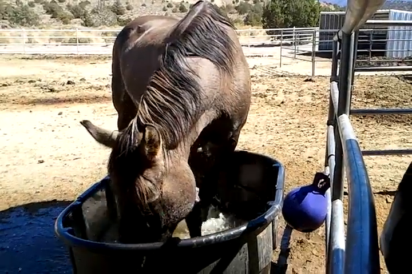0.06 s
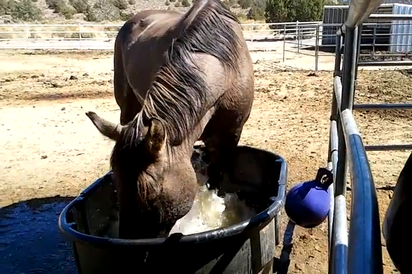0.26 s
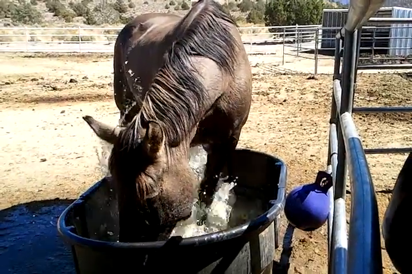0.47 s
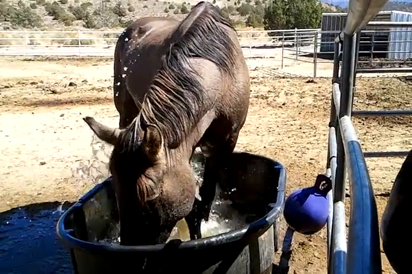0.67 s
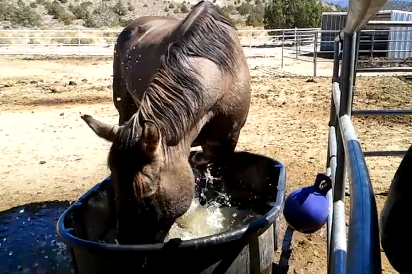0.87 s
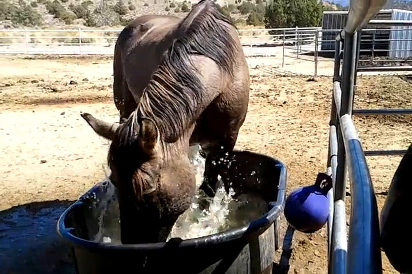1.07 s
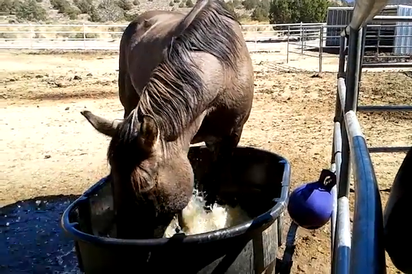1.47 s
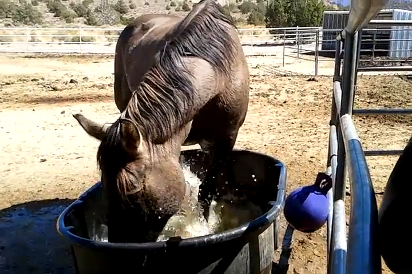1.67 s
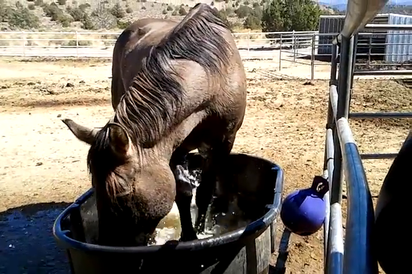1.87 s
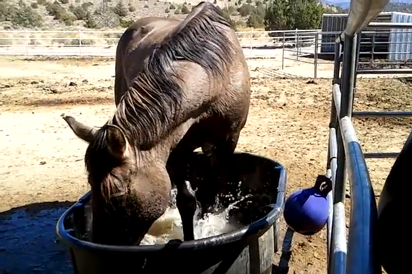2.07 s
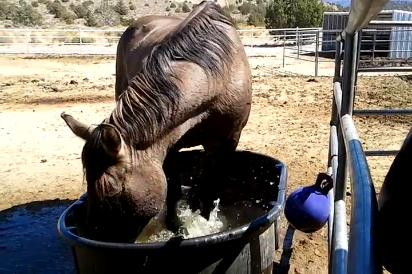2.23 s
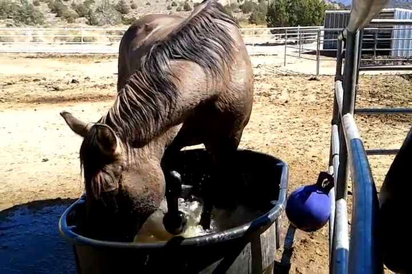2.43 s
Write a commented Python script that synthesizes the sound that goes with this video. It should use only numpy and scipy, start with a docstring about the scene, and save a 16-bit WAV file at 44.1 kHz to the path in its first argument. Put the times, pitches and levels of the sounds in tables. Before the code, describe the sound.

Splashing water and hollow hoof thumps from a horse pawing in a plastic tub.

```python
"""Booming knocks and splashing water: a horse paws in a big plastic trough in an open corral.
Its hoof hits the wall and floor, which boom briefly. Its leg throws up slaps, spray and bubbles
and drags gulps of air under, while the water heaves against the tub.
A faint breeze lies behind it all, and the two hardest knocks overload the microphone."""
import sys
import numpy as np
from scipy import signal
from scipy.fft import rfft, irfft, next_fast_len
from scipy.io import wavfile
from scipy.ndimage import map_coordinates

SR = 44100
rng = np.random.default_rng(int(sys.argv[2]) if len(sys.argv) > 2 else 0)


def dump(signal):
    """Clip the signal to [-1, 1] and save it as 16-bit WAV at the path in sys.argv[1]."""
    limited = np.clip(np.atleast_2d(signal).T, -1, 1)
    pcm = np.round(limited * 32767).astype(np.int16)
    wavfile.write(sys.argv[1], SR, pcm)


N = 110250  # 2.5 seconds

# Hoof blows (time [s], level [dB], brightness [dB per octave], rise time [s],
# crack level [dB], ring length [factor])
HOOF_BLOWS = [(.232, -21, 4.5, 0.0039, -42, 1.1), (0.26, -20, 2.5, 0.0015, -18, .6),
              (0.4373, -5, -1, 0.0015, -9, .9), (0.495, -17.5, -2.5, 0.0021, -55, 1.1),
              (0.566, -17.5, -5.5, 0.0034, -45, 0.22), (0.886, -25, 7.5, 0.0037, -26, 0.94),
              (0.902, -30.5, 5, 0.001, -28, 1.5), (1.0821, -5.5, 1, 0.0023, -13.5, 0.77),
              (1.16, -19.5, -4, 0.013, -39, 0.93), (1.754, -22.5, -2, 0.0027, -41, 0.94),
              (2.174, -18, -2, 0.0039, -22.5, 0.91)]
# The filled trough's own notes, varied by each blow (pitch [Hz], level [dB], base fade time [s])
TROUGH_NOTES = [(45.6, -12.5, 0.25), (89, -7, 0.15), (117.1, -0.5, 0.37), (135.9, -8, 0.24),
                (175.4, -4, 0.35), (198.3, -8, 0.41), (221.3, -9.5, 0.34), (270.5, -8.5, 0.48),
                (292.7, -3.5, 0.23), (336, -12.5, 0.3), (386.2, -14, 0.25), (439.6, -10.5, 0.17),
                (489, -10.5, 0.15), (737, -20.5, 0.17)]
# Tone of the wall's many short vibrations (frequency [Hz], level [dB])
THUMP_TONE = [(30, -23), (100, -0.5), (300, -4), (520, -14), (800, -22), (1500, -26), (4000, -73.5)]
# Tone of the floor drumming under the water's weight (frequency [Hz], level [dB])
RUMBLE_TONE = [(30, -17.5), (80, -3.5), (120, 1.5), (190, 0), (290, -5), (400, -21), (800, -46.5)]
# Tone of the sharp crack of hoof on plastic (frequency [Hz], level [dB])
CRACK_TONE = [(200, -21), (600, -3.5), (1300, 6.5), (2000, 3.5), (2900, 6.5), (4000, -1), (5000, -9.5),
              (7000, -18), (9000, -56.5)]

def hoof_knocks():
    """Each blow cracks and thumps, then settles into the low notes of the trough."""
    out, t = np.zeros(N), np.arange(N) / SR
    hz, db, fades = np.transpose(TROUGH_NOTES)
    for start, blow_db, tilt_db, rise, crack_db, ring in HOOF_BLOWS:
        gains = amp(db + tilt_db * np.log2(hz / 200) + 2.75 * rng.standard_normal(len(hz)))
        pitches = hz * (1 + 0.0099 * rng.standard_normal(len(hz)))
        phases = 2 * np.pi * rng.random(len(hz))
        boom = np.zeros(N)
        for gain, pitch, fade, phase in zip(gains, pitches, fades, phases):
            note = np.sin(2 * np.pi * pitch * (t - start) + phase)
            boom += gain * strike(start, rise, fade * ring) * note
        thump = amp(-5) * strike(start, rise / 2, 0.14 * ring) * colour(hiss(), THUMP_TONE, tilt_db)
        rumble = amp(-8.5) * strike(start, 0.0099, 0.31 * ring) * colour(hiss(), RUMBLE_TONE, tilt_db)
        crack = amp(crack_db) * strike(start, 0.0006, 0.048) * colour(hiss(), CRACK_TONE)
        out += amp(blow_db) * (boom + thump + rumble) + crack
    return out


# Slaps of thrown water (time [s], level [dB], rise time [s], fade time [s], drop pitch [Hz],
# cut one octave from that pitch [dB])
WATER_SLAPS = [(0.027, -27.5, 0.0028, 0.12, 950, 5), (0.048, -14, .004, 0.061, 4440, -1),
               (.202, -14, .002, 0.021, 4600, 1), (0.238, -22.5, .003, 0.063, 2700, -1),
               (.291, -23, .004, 0.034, 6540, 25), (.665, -20.5, 0.0069, 0.062, 1100, 7.5),
               (0.687, -24, .003, 0.14, 5800, 1.5), (.734, -25.5, 0.0041, 0.078, 5500, 14),
               (0.8438, -18, 0.0023, .07, 3400, 3), (0.881, -23.5, 0.0027, 0.17, 1800, 7),
               (0.952, -30.5, 0.0036, 0.038, 2200, 5), (1.012, -23, .002, 0.027, 2700, -2),
               (1.076, -21.5, .002, .07, 3200, 9), (1.151, -18, 0.0038, 0.041, 3000, 10),
               (1.359, -17.5, .003, .05, 2600, 3), (1.397, -19, .003, 0.061, 2800, -2),
               (1.652, -28.5, 0.0041, 0.25, 5300, 9), (1.695, -20.5, .002, 0.069, 5000, 5),
               (1.825, -25.5, 0.0024, 0.097, 4000, 4), (2.0203, -17.5, 0.0011, 0.1, 2200, 4),
               (2.07, -18, .004, 0.053, 1500, 2), (2.139, -23, .003, 0.024, 2200, 1),
               (2.347, -20, .002, 0.025, 2600, 5), (2.405, -31, 0.0035, 0.13, 6000, 9)]
# Tone of landing drops, in both slaps and spray (frequency [Hz], level [dB])
DROP_TONE = [(500, -19.5), (1000, -12.5), (1300, -8), (1650, -11), (1900, -2.5), (2150, -1), (2400, -3.5),
             (2700, -1), (3200, -1.5), (4200, -4.5), (4800, -12.5), (6800, -14), (8000, -34.5), (9000, -33)]

def slaps():
    """Each slap is a sudden, dense burst of drops thrown clear of the tub."""
    drops = bubbles(710, 8000, cycles=5.3, spread_db=0.5, glide=0, count=7000, samples=200)
    hz, drop_db = np.transpose(DROP_TONE)
    out = np.zeros(N)
    for start, db, rise, fade, pitch, cut_db in WATER_SLAPS:
        burst = np.roll(drops, rng.integers(N)) + hiss()
        tone = np.column_stack([hz, drop_db - cut_db * np.log2(hz / pitch) ** 2])
        out += amp(db) * strike(start, rise, fade) * colour(burst, tone)
    return out


# How the falling spray swells and fades (time [s], relative level [dB])
SPRAY_LEVELS = [(0, -30.5), (.11, -30), (.17, -31.5), (.31, -28), (.42, -33), (.48, -27), (.54, -33),
                (.64, -30.5), (.72, -25.5), (.82, -29.5), (.92, -25.5), (1.05, -27.5), (1.22, -32.5),
                (1.33, -28), (1.5, -25), (1.6, -25), (1.66, -27.5), (1.79, -32), (1.9, -30.5), (2, -29),
                (2.12, -31), (2.21, -25.5), (2.28, -35), (2.41, -35), (2.5, -36)]

def spray():
    """Drops patter back onto the water and leave small, fizzing bubbles."""
    drops = bubbles(830, 9200, cycles=1.75, spread_db=0, glide=0, count=7000, samples=200)
    fizz = bubbles(1070, 6530, cycles=13, spread_db=0.5, glide=0.1, count=3800, samples=1000)
    water = drops + amp(-2.5) * fizz + amp(-3) * hiss()
    flicker = amp(1.1 * wobble(per_second=45.33) - 1.92)
    return level(SPRAY_LEVELS) * flicker * colour(water, DROP_TONE)


# Loudness of the air dragged under by the leg (time [s], level [dB])
GULP_LEVELS = [(0, -49), (.04, -40.5), (.14, -39.5), (.35, -39.5), (.6, -34), (.85, -36.5), (.94, -25),
               (1.01, -38.5), (1.3, -29), (1.34, -36), (1.41, -23), (1.56, -30.5), (1.7, -38),
               (1.83, -32.5), (1.91, -35), (1.97, -32.5), (2.03, -35.5), (2.2, -38), (2.37, -51),
               (2.44, -32.5), (2.5, -48.5)]
# Hollow tone of the gulps (frequency [Hz], level [dB])
GULP_TONE = [(60, -38.5), (130, -6), (190, -4), (235, -11), (300, 6), (420, 5), (520, -4.5), (650, -22),
             (1500, -52)]

def gulps():
    """Big pockets of air ring low, and the tub shapes their tone."""
    pockets = bubbles(151.8, 560, cycles=26.5, spread_db=3, glide=0.047, count=600, samples=6000)
    return level(GULP_LEVELS) * colour(pockets + amp(5) * hiss(), GULP_TONE)


# Water heaving against the tub (time [s], relative level [dB], pitch [Hz])
WATER_SURGES = [(0.242, -15, 70), (0.887, -21.5, 59.3), (1.17, -21.5, 55), (1.284, -22, 44.4),
                (1.38, -18, 62.3), (1.469, -14.5, 59.4), (1.551, -24, 59.3), (1.681, -20, 50.5),
                (1.731, -14, 76), (1.805, -19, 48), (2.22, -30, 60)]

def surges():
    """The weight of the water shoves the wall in slow, soft thuds."""
    out, t = np.zeros(N), np.arange(N) / SR
    for start, db, hz in WATER_SURGES:
        shove = 2 * amp(db) * strike(start, rise_s=0.015, fade_s=0.1)
        out += shove * np.sin(2 * np.pi * hz * (t - start))
    return out


# Loudness of the stirred water (time [s], level [dB])
CHURN_LEVELS = [(0, -37.5), (.07, -35), (.16, -46.5), (.3, -38), (.42, -37.5), (.6, -38), (.7, -37.5),
                (.92, -31), (1.03, -40.5), (1.13, -35.5), (1.22, -35.5), (1.33, -35.5), (1.46, -38.5),
                (1.58, -29.5), (1.65, -45), (1.75, -42.5), (1.95, -44), (2.08, -39), (2.2, -34.5),
                (2.3, -46), (2.5, -41.5)]
# Tone of its burbling (frequency [Hz], level [dB])
CHURN_TONE = [(150, -11.5), (400, 0.5), (700, -8), (1250, -2), (1650, -7.5), (2500, -18), (6000, -36)]

def churn():
    """Middle-sized bubbles burble in the stirred water."""
    burble = bubbles(465, 2200, cycles=21.4, spread_db=1.5, glide=0.08, count=1400, samples=2400)
    return level(CHURN_LEVELS) * colour(burble + amp(0.5) * hiss(), CHURN_TONE)


# Loudness of fine drops raining back (time [s], level [dB])
MIST_LEVELS = [(0, -39.5), (.3, -44.5), (.42, -46), (.62, -43), (.75, -40.5), (1.1, -39.5), (1.22, -41),
               (1.5, -43.5), (1.69, -39), (1.76, -45.5), (1.9, -45), (2.1, -39.5), (2.19, -40.5),
               (2.3, -43.5), (2.5, -52.5)]
# Their thin, high tone (frequency [Hz], level [dB])
MIST_TONE = [(1500, -28), (3000, -8), (4200, 9.5), (4900, -4), (6600, -5), (7400, -5), (8200, -18.5),
             (9000, -40)]

def mist():
    """The finest drops tick on the water and the rim."""
    ticks = bubbles(3000, 12000, cycles=3.1, spread_db=3.5, glide=0, count=4000, samples=150)
    return level(MIST_LEVELS) * colour(ticks + amp(7.5) * hiss(), MIST_TONE)


def tub_echo(sound):
    """Sound bounces between the trough's walls and gains a short tail of echoes."""
    tail = (hiss() * strike(0.00067, rise_s=0.003, fade_s=0.21))[:SR // 4]
    return sound + amp(-9) * signal.fftconvolve(sound, tail / np.linalg.norm(tail))[:N]


# Deep tone of the open air (frequency [Hz], level [dB])
AIR_TONE = [(20, 1), (45, -6.5), (100, -2.5), (250, -12), (1000, -19), (4000, -49.5), (9000, -45.5)]

def open_air():
    """A breeze and distant ground noise make a faint, wavering rumble."""
    return amp(-39.5 + 0.67 * wobble(per_second=7.26)) * colour(hiss(), AIR_TONE)


def amp(db):
    """Turn decibels into a number to multiply a sound by."""
    return 10 ** (np.asarray(db) / 20)


def unit(sound):
    """Scale a sound so its average strength (rms) is 1."""
    return sound / np.sqrt(np.mean(sound ** 2) + 1e-20)


def hiss():
    """Fresh white noise for the whole scene."""
    return rng.standard_normal(N)


def level(rows):
    """Join (time [s], level [dB]) points into a volume curve."""
    return amp(np.interp(np.arange(N) / SR, *np.transpose(rows)))


def wobble(per_second):
    """A smooth curve through this many random values each second."""
    return map_coordinates(rng.standard_normal(400), [np.arange(N) * per_second / SR], mode="wrap")


def colour(sound, tone, tilt_db=0):
    """Give a sound a tone, brightened by tilt_db per octave, at strength 1."""
    size = 2 * next_fast_len(N // 2 + 4096)
    octave = np.log2(np.fft.rfftfreq(size, 1 / SR) + 1)
    hz, db = np.transpose(tone)
    gain = amp(np.interp(octave, np.log2(hz), db + tilt_db * np.log2(hz / hz[0])))
    # Fold the filter so that it rings only after a sound, never before it.
    folded = irfft(np.log(gain))
    folded[1:size // 2] *= 2
    folded[size // 2 + 1:] = 0
    return unit(irfft(rfft(sound, size) * np.exp(rfft(folded)))[:N])


def strike(start_s, rise_s, fade_s):
    """The volume curve of a hit: it rises, and dies away by 60 dB per fade time."""
    age = np.maximum(np.arange(N) / SR - start_s, 0)
    return (1 - np.exp(-age / rise_s)) * np.exp(-np.log(1000) * age / fade_s)


def bubbles(low_hz, high_hz, cycles, spread_db, glide, count, samples):
    """Random pings that each fade over about `cycles` vibrations; glide bends their pitch up."""
    when, pitch, strength, life = rng.random((count, 4)).T[:, :, None]
    hz = low_hz * (high_hz / low_hz) ** pitch
    turns = hz * np.arange(samples) / SR
    age = turns / (cycles * (.5 + life))
    volume = amp(-spread_db * np.log(np.maximum(strength, .02)) - 60 * age)
    pings = volume * np.sin(2 * np.pi * turns * (1 + glide * age / 2))
    positions = ((when * N).astype(int) + np.arange(samples)) % N
    return unit(np.bincount(positions.ravel(), pings.ravel(), N))


def scene():
    """Water, hoof and open air meet at one microphone."""
    air = open_air()
    water = tub_echo(spray() + churn() + mist()) + slaps() + gulps() + surges()
    return (hoof_knocks() + water + air)[None]


def record(dry):
    """The recorder sits slightly off zero, flattens the hardest knocks and cuts the highest treble."""
    offset, ceiling = -0.032, 0.71
    top_hz, roll_off_hz = 9000, 700
    shifted = dry + offset
    clipped = shifted / (1 + np.abs(shifted / ceiling) ** 12) ** (1 / 12)
    hz = np.fft.rfftfreq(N, 1 / SR)
    treble_cut = np.clip((top_hz - hz) / roll_off_hz, 0, 1)
    return irfft(rfft(clipped) * treble_cut, N)


dry = scene()
out = record(dry)
dump(out)
```